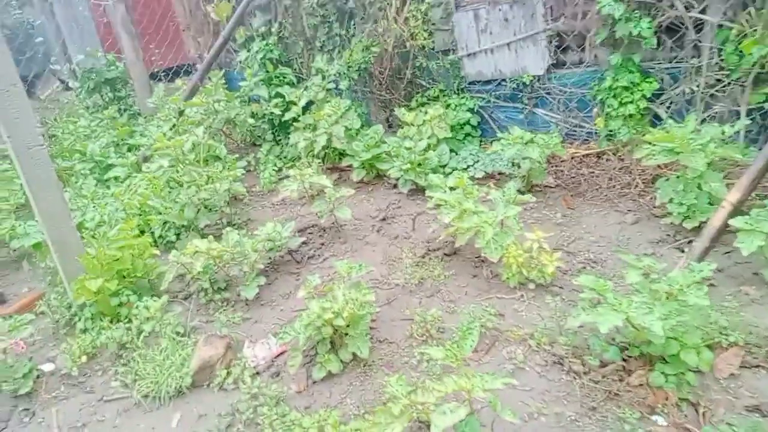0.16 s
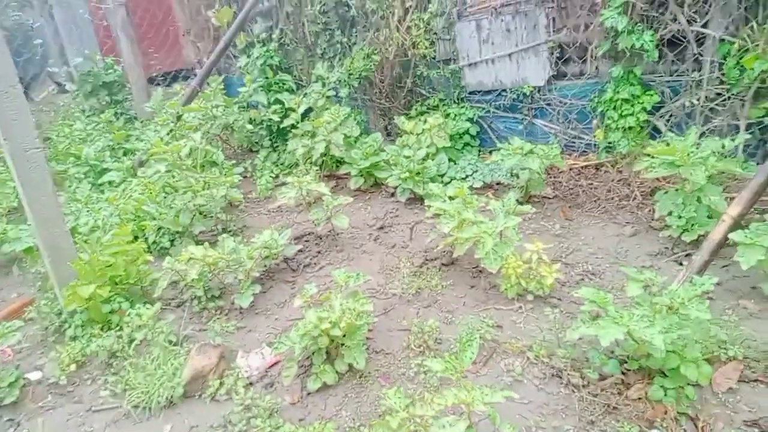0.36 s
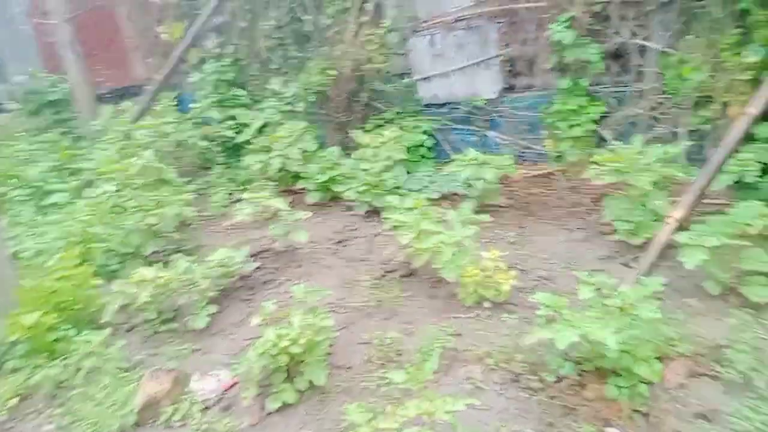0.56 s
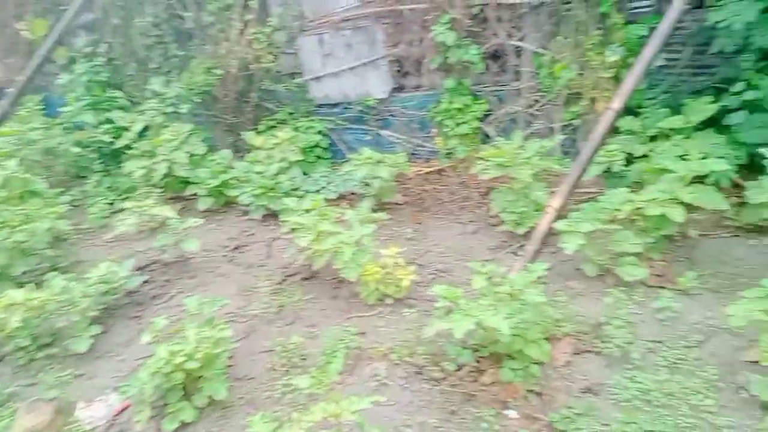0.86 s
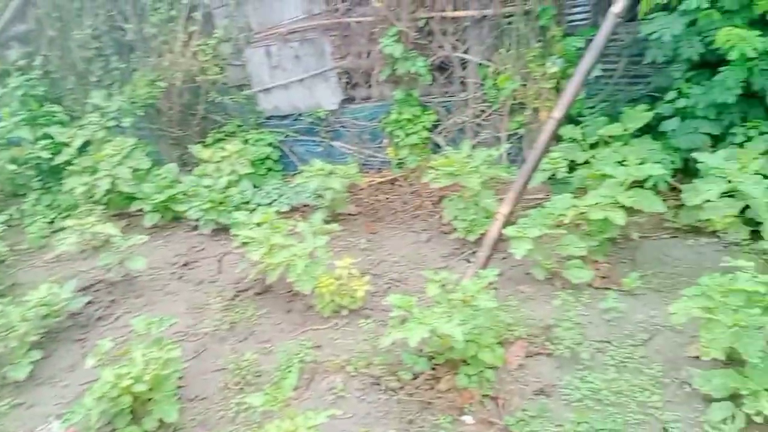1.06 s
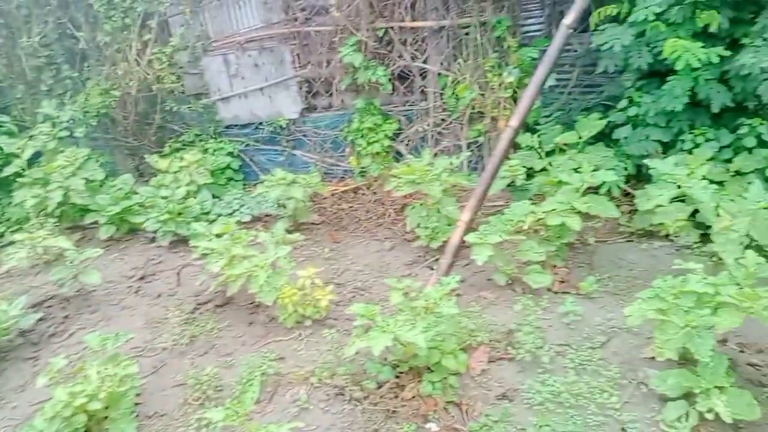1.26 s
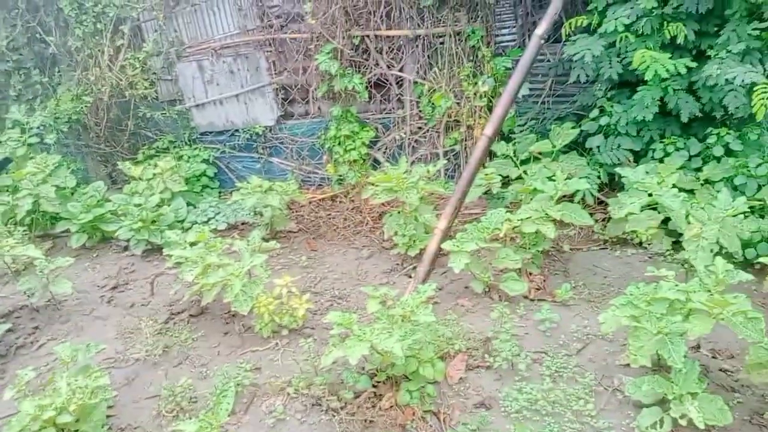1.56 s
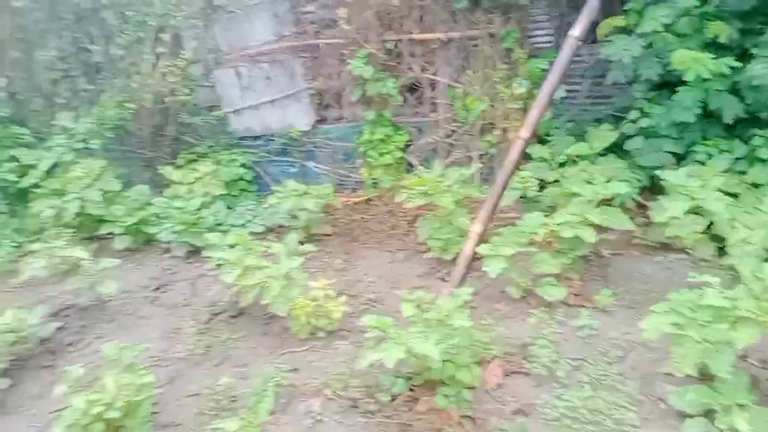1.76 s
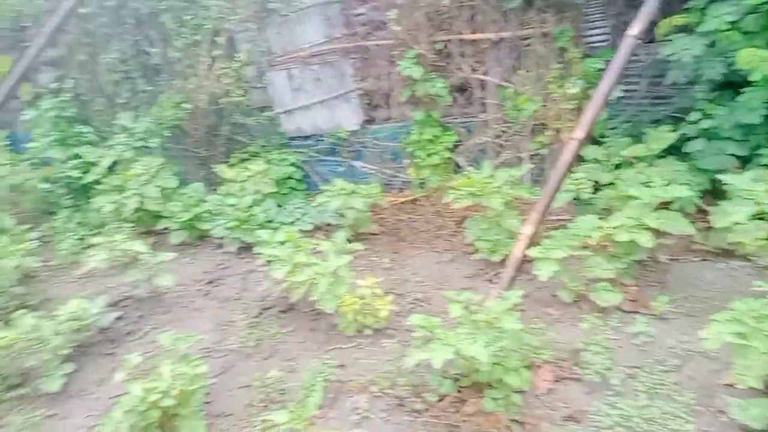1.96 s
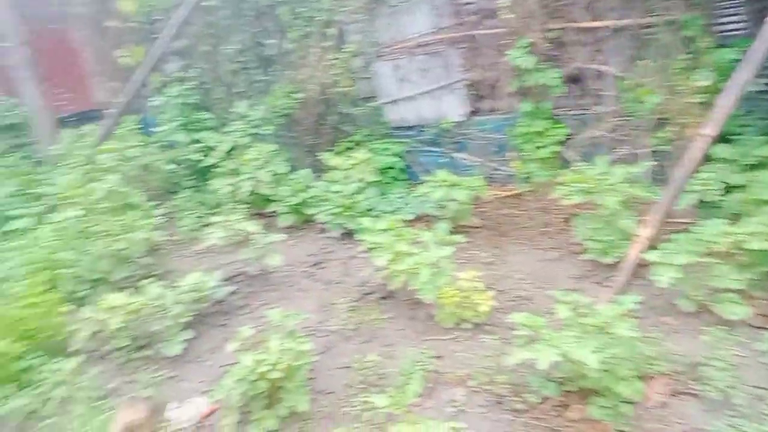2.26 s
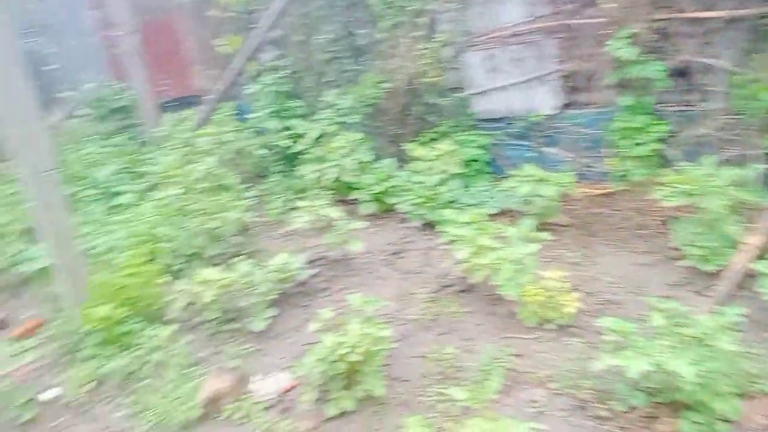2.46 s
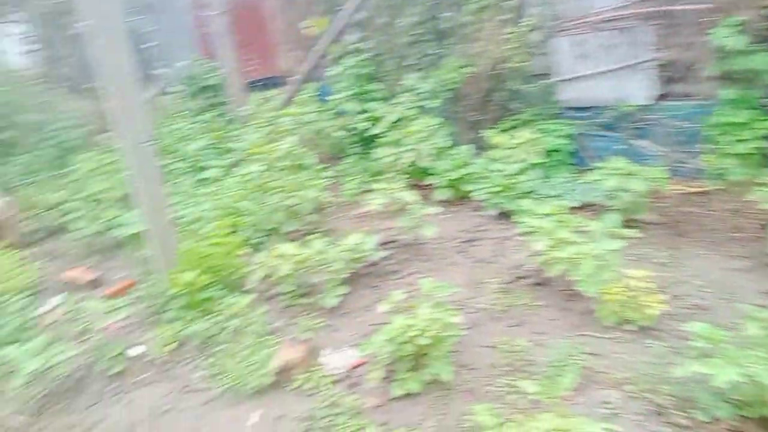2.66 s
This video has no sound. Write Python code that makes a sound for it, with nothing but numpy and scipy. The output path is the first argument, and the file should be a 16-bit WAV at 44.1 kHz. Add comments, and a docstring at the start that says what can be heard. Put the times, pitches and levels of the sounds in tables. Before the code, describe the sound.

Steady rain hisses and patters on leaves and bare soil in a small fenced garden, while fat drops tap irregularly close to the microphone, with small bubble plinks, faint spray ticks and a few soft low thumps.

```python
"""Steady rain in a leafy garden

Far rain is a wash of shaped noise; random pulses make a dense patter on leaves and a faint mist of droplets.
Close by, fat drops tap sharply, each a short pulse with a tiny splash, and spray ticks as brief noise bursts.
Fading sine tones make a hollow hum and bubble plinks; short low waves make soft thumps at the microphone.
The fence and walls answer the near sounds with a short echo, made from fading noise."""
import sys
import numpy as np
from scipy import signal
from scipy.fft import rfft, irfft
from scipy.io import wavfile
from scipy.ndimage import uniform_filter1d

SR = 44100
rng = np.random.default_rng(int(sys.argv[2]) if len(sys.argv) > 2 else 0)


def file_out(sig):
    """Save sig as 16-bit WAV at sys.argv[1]."""
    # one column per channel
    cols = np.atleast_2d(sig).T
    # limit, then scale
    lim = np.clip(cols, -1, 1)
    pcm = np.round(lim * 32767).astype(np.int16)
    wavfile.write(sys.argv[1], SR, pcm)


N = 123479  # length in samples


def amp(db):
    """Turns decibels into gain."""
    return 10 ** (np.asarray(db) / 20)


def unit(x):
    """Scales a signal to an rms of 1."""
    return x / np.sqrt(np.mean(x ** 2) + 1e-20)


def read(points, hz):
    """Reads a table at any frequency, on a log-frequency axis."""
    f, value = np.transpose(points)
    return np.interp(np.log(hz + 1), np.log(f + 1), value)


def add(mix, start_s, sound):
    """Mixes a sound in at its start time."""
    part = mix[max(round(start_s * SR), 0):][:len(sound)]
    part += sound[:len(part)]


def bins(size):
    """Lists the frequencies of a spectrum of this many samples."""
    return np.fft.rfftfreq(size, 1 / SR)


def hump(hz, centre_hz, octaves):
    """A bell-shaped resonance on the log-frequency axis."""
    return np.exp(-.5 * (np.log2((hz + 1) / centre_hz) / octaves) ** 2)


def click(db):
    """The sharpest pulse with this spectrum that has no sound before its start; its energy is 1."""
    log_gain = np.log(amp(np.r_[db, db[-2:0:-1]]))
    spectrum = np.exp(np.conj(signal.hilbert(log_gain)))
    pulse = np.fft.ifft(spectrum).real
    return pulse / np.linalg.norm(pulse)


def random_drops(per_s, spread_db, top_db):
    """Drops at random moments, most of them small and a few large, as single-sample spikes."""
    size = amp(np.minimum(spread_db * rng.exponential(1, N), top_db))
    return size * (rng.random(N) < per_s / SR)


# How hard it rains: time_s, gain_db
RAIN_STRENGTH = [(0, 1), (.35, 1.84), (.6, 0.5), (1.1, 0.5), (1.5, 0.24), (1.9, -0.56), (2.25, 1), (2.5, 1),
                 (2.8, 0)]


def strength():
    """The gain of the steady rain, gliding from point to point."""
    return amp(np.interp(np.arange(N) / SR, *np.transpose(RAIN_STRENGTH)))


# Colour of the far rain: pitch_hz, relative_level_db
WASH_COLOUR = [(25, -49), (44, -45), (62, -11.5), (125, -8.5), (195, -10), (330, -7.5), (600, -8.5),
               (1000, -7), (1450, -12.5), (2050, -1), (2650, -0.5), (3250, 1), (3800, -1.5), (4400, -13),
               (5200, -21.5), (6500, -40), (8000, -42.5), (10500, -45.5), (11400, -40), (12500, -49),
               (15500, -55)]
WASH_DB = -35  # level before the rain strength
PATCH_DB, SWELL_DB = 1.68, 0.96  # typical (rms) wander of the gain


def wash():
    """Far rain: so many drops merge into a hiss, with drifting patches and a slight swell."""
    frames = N // 128 + 6
    real, imaginary, patches = rng.standard_normal((3, frames, 257))
    # smooth the patches over time, then over pitch
    patches = uniform_filter1d(patches, size=8, axis=0)
    patches = unit(uniform_filter1d(patches, size=7, axis=1))
    swell = unit(uniform_filter1d(rng.standard_normal(frames), size=20))[:, None]
    gain = amp(PATCH_DB * patches + SWELL_DB * swell)
    noise_frames = (real + 1j * imaginary) * gain
    noise = signal.istft(noise_frames.T, nperseg=512, noverlap=384)[1][:N]
    coloured = irfft(rfft(noise) * amp(read(WASH_COLOUR, bins(N))), N)
    return amp(WASH_DB) * unit(coloured)


# Colour of tiny droplets, in mist and spray: pitch_hz, relative_level_db
DROPLET_COLOUR = [(1000, -18), (3000, 4), (4300, -2), (5300, 9), (7000, -1), (11500, -2.5), (13000, -17),
                  (16000, -17)]
MIST_PER_S = 80  # average number of droplets
MIST_SPREAD_DB, MIST_TOP_DB = 3.5, 11  # spread and upper limit of their relative size
MIST_DB = -70.5  # level before the rain strength


def mist():
    """The finest droplets: each one ticks faintly, at a random moment."""
    drops = random_drops(MIST_PER_S, MIST_SPREAD_DB, MIST_TOP_DB)
    droplet = click(read(DROPLET_COLOUR, bins(size=512)))
    return amp(MIST_DB) * unit(signal.oaconvolve(drops, droplet)[:N])


# Shared colour of the small drops on leaves: pitch_hz, relative_level_db
PATTER_COLOUR = [(60, -19), (150, -15.5), (340, -8), (700, -12), (1400, -8.5), (2000, -10.5), (3300, 2.5),
                 (3900, -5), (5000, -30.5), (6500, -28), (8000, -39), (11500, -40), (15500, -49)]
PATTER_PER_S = 1500  # average number of drops
PATTER_SPREAD_DB, PATTER_TOP_DB = 4, 18.5  # spread and upper limit of their relative size
PATTER_DB = -40.5  # level before the rain strength
LEAF_HZ, LEAF_DB = (1450, 4140), 10  # lowest and highest leaf pitch, boost at that pitch


def patter(count=32):
    """Countless small drops of random size fall on leaves that each ring at their own pitch."""
    out, hz = np.zeros(N), bins(size=2048)
    drops = random_drops(PATTER_PER_S, PATTER_SPREAD_DB, PATTER_TOP_DB)
    drops = drops * rng.choice([-1, 1], N)
    leaf = rng.integers(0, count, N)
    octaves_from_3k = np.log2(np.clip(hz, 400, 8000) / 3000)
    for k, ring_hz in enumerate(np.geomspace(*LEAF_HZ, count)):
        ring_db = LEAF_DB * hump(hz, ring_hz, octaves=0.15)
        tilt_db = rng.normal() * 0.75 * octaves_from_3k  # some leaves duller, some brighter
        tap = click(read(PATTER_COLOUR, hz) + ring_db + tilt_db)
        out += signal.oaconvolve(drops * (leaf == k), tap)[:N]
    return amp(PATTER_DB) * unit(out)


# Soft low thumps at the microphone: centre_s, level_db, pitch_hz
THUMPS = [(1.84, -52, 62), (2.105, -40.5, 113), (2.244, -48, 60.4), (2.505, -41.5, 160),
          (2.545, -46.5, 114)]
THUMP_CYCLES = 1.06  # width of the bell-shaped swell, in cycles


def thumps():
    """Soft low thumps: each is a sine wave that swells and fades within a few cycles."""
    out, t = np.zeros(N), np.arange(N) / SR
    for centre_s, level_db, pitch_hz in THUMPS:
        cycles = (t - centre_s) * pitch_hz
        swell = np.exp(-.5 * (cycles / THUMP_CYCLES) ** 2)
        out += amp(level_db) * swell * np.sin(2 * np.pi * (cycles + rng.random()))
    return out


# Something hollow, set humming by one drop: pitch_hz, level_db, time_to_fade_60_db_s
HOLLOW_TONES = [(337.5, -41.5, 0.58), (456, -51, 0.66)]
HOLLOW_START_S = 0.12


def hollow_hum():
    """A hollow thing hums after one drop: its tones start together and fade away."""
    out, t = np.zeros(N), np.arange(SR) / SR
    for pitch_hz, level_db, fade_s in HOLLOW_TONES:
        tone = np.sin(2 * np.pi * pitch_hz * t)
        add(out, HOLLOW_START_S, amp(level_db - 60 * t / fade_s) * tone)
    return out


# Small ringing bubbles: start_s, pitch_hz, level_db
BUBBLES = [(0.945, 1770, -29), (1.186, 3300, -36), (2.475, 3250, -25)]
BUBBLE_FADE_S = 0.0043  # time to fall to 37 %


def bubble_plinks():
    """A bubble rings as one pure tone that dies out within milliseconds."""
    out, t = np.zeros(N), np.arange(SR) / SR
    for start_s, pitch_hz, level_db in BUBBLES:
        tone = np.sin(2 * np.pi * pitch_hz * t)
        add(out, start_s, amp(level_db) * np.exp(-t / BUBBLE_FADE_S) * tone)
    return out


# Bright ticks of spray: start_s, level_db (at the start of the tick)
SPRAY_TICKS = [(.236, -56), (.276, -58), (0.329, -51), (.359, -54), (.420, -43), (.474, -48), (.519, -55),
               (0.722, -47), (1.036, -55), (1.084, -52), (1.1, -45), (1.323, -55), (1.804, -52)]
SPRAY_FADE_S = .0045  # time to fall to 37 %


def spray():
    """A burst of tiny droplets makes a short bright tick: rough noise that fades quickly."""
    out, t = np.zeros(N), np.arange(2048) / SR
    droplet = click(read(DROPLET_COLOUR, bins(size=512)))
    for start_s, level_db in SPRAY_TICKS:
        rough = rng.standard_normal(len(t)) * rng.exponential(1, len(t))
        burst = unit(rough) * np.exp(-t / SPRAY_FADE_S)
        add(out, start_s, amp(level_db) * np.convolve(burst, droplet))
    return out


# Fat drops close by: start_s, thud_db, knock_hz, knock_db, ring_hz, ring_db, snap_db
FAT_DROPS = [(0.1110, -25.5, 2300, -24, 3400, -26.5, -36.5), (0.15, -30.5, 1930, -23.5, 3550, -27.5, -49),
             (0.229, -48, 2130, -44, 3120, -41, -50), (0.277, -36, 2580, -28.5, 3600, -31.5, -49),
             (0.334, -47, 2480, -39, 3820, -31, -43), (0.4645, -37.5, 1570, -30, 3780, -26, -37),
             (0.6755, -31, 2420, -25, 3800, -24.5, -37), (0.7258, -41, 2670, -28.5, 4300, -36, -50),
             (0.7707, -35.5, 2660, -36, 3430, -33, -45), (0.7833, -32.5, 2360, -30.5, 3390, -22.5, -37.5),
             (0.81, -42, 1810, -35.5, 3340, -32, -49), (0.9092, -43, 2040, -33, 3900, -32, -45),
             (1.1147, -34.5, 1270, -32, 3380, -23.5, -42), (1.2052, -29.5, 2490, -31.5, 3350, -32, -49),
             (1.4881, -40, 1950, -37.5, 3450, -31.5, -46), (1.5148, -33, 2320, -43, 3140, -38, -50),
             (1.5639, -33.5, 2140, -26.5, 3500, -28.5, -39.5), (1.5900, -31, 2590, -35, 3220, -30, -50),
             (2.0487, -39, 2060, -38, 3200, -25.5, -48), (2.0760, -33.5, 2230, -32, 3450, -24.5, -47),
             (2.2200, -36, 2220, -33, 3200, -29.5, -49), (2.3593, -26.5, 1770, -23.5, 3260, -22, -35.5),
             (2.3990, -36, 2130, -21, 3500, -27, -38.5), (2.4314, -32, 1870, -28, 3200, -21, -40.5),
             (2.5457, -38.5, 2200, -30.5, 3210, -40, -50), (2.6138, -31.5, 1930, -32.5, 3210, -24.5, -44),
             (2.6469, -35, 1720, -33, 3270, -33, -52), (2.7945, -37, 1900, -33, 3280, -33, -56)]
# Colour of the dull thud of a drop: pitch_hz, relative_level_db
THUD_COLOUR = [(40, -42), (150, -7), (400, 2.5), (700, 0), (1300, -0.5), (2500, -18.5), (4500, -36),
               (8000, -60)]
# Colour of the bright snap of a drop: pitch_hz, relative_level_db
SNAP_COLOUR = [(1000, -26), (3000, -11.5), (4500, 7.5), (5500, -1), (6500, -11.5), (8000, -18),
               (11500, -24), (16000, -44)]
TAP_S = 0.0028  # the levels hold as an average over this time
KNOCK_OCTAVES, RING_OCTAVES = 0.22, 0.16  # widths of the two leaf resonances
SPLASH_S, SPLASH_DB = .0007, -9  # when the splash envelope peaks, its level relative to the tap


def fat_drops():
    """Each drop is one pulse: a dull thud, two short leaf resonances and a snap, then a tiny splash."""
    out, hz, t = np.zeros(N), bins(size=2048), np.arange(512) / SR
    for start_s, thud_db, knock_hz, knock_db, ring_hz, ring_db, snap_db in FAT_DROPS:
        parts = [(thud_db, amp(read(THUD_COLOUR, hz))),
                 (knock_db, hump(hz, knock_hz, KNOCK_OCTAVES)),
                 (ring_db, hump(hz, ring_hz, RING_OCTAVES)),
                 (snap_db, amp(read(SNAP_COLOUR, hz)))]
        power = sum((amp(db) * unit(shape)) ** 2 for db, shape in parts)
        tap = click(10 * np.log10(power)) * np.sqrt(power.mean() * TAP_S * SR)
        splash = rng.standard_normal(len(t)) * t * np.exp(-t / SPLASH_S)
        splash = amp(SPLASH_DB) * splash / np.linalg.norm(splash)
        hit = (t == 0) + splash  # the tap itself, then its splash
        add(out, start_s, np.convolve(tap, hit))
    return out


# Echo of the fence and walls: pitch_hz, time_to_fade_60_db_s
YARD_FADE = [(200, 0.34), (1000, 0.08), (4000, 0.029), (12000, 0.033)]
YARD_DB = -11.5  # echo energy relative to the direct sound


def yard(x):
    """A short blurred echo, made from noise whose low pitches last longest."""
    hz, t, noise = signal.stft(rng.standard_normal(SR // 2), SR, nperseg=256)
    fade = amp(-60 * t / read(YARD_FADE, hz)[:, None])
    tail = signal.istft(noise * fade, SR, nperseg=256)[1]
    silence = np.zeros(round(.003 * SR))  # the echo arrives 3 ms late
    tail = np.r_[silence, tail / np.linalg.norm(tail)]
    return amp(YARD_DB) * signal.fftconvolve(x, tail)[:N]


def scene():
    """Near sounds with their echo and dry thumps, over the steady rain."""
    steady_rain = strength() * (wash() + mist() + patter())
    near = hollow_hum() + bubble_plinks() + spray() + fat_drops()
    return (steady_rain + thumps() + near + yard(near))[None]


CUT_HZ = 15700


def record(dry):
    """Removes the highest treble with a steep low-pass filter."""
    low_pass = signal.firwin(511, CUT_HZ, window=("kaiser", 9), fs=SR)
    return signal.oaconvolve(dry, low_pass[None], "same")


dry = scene()
out = record(dry)
file_out(out)
```